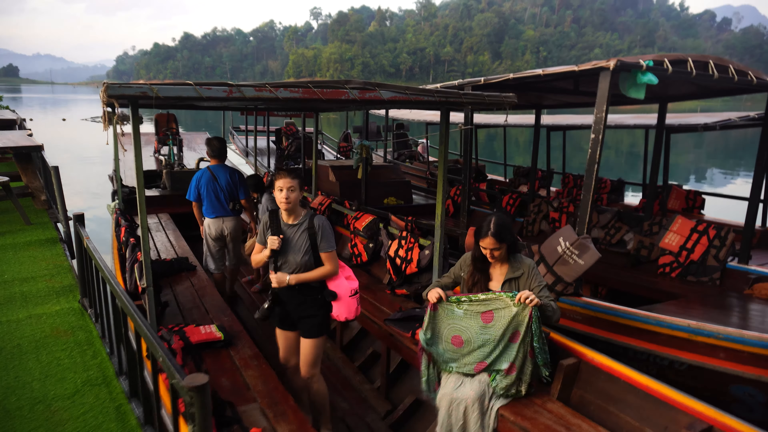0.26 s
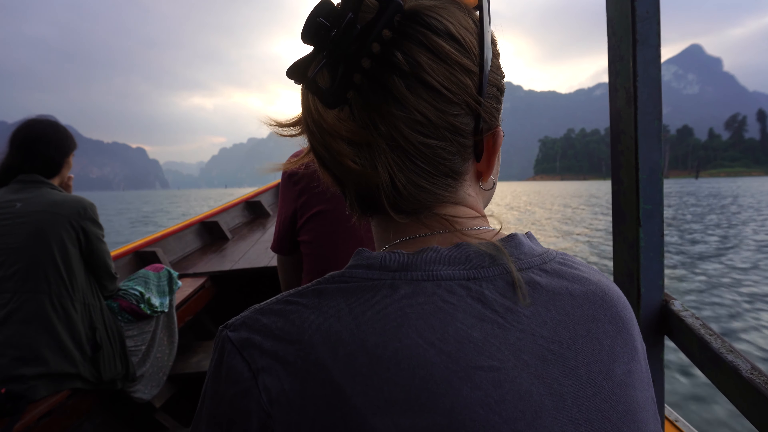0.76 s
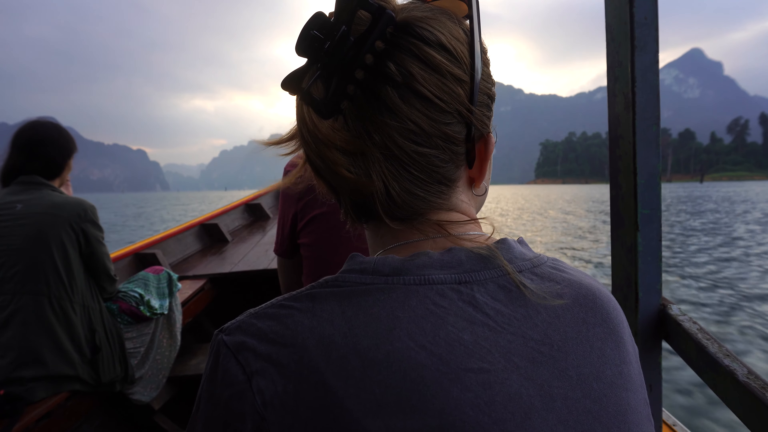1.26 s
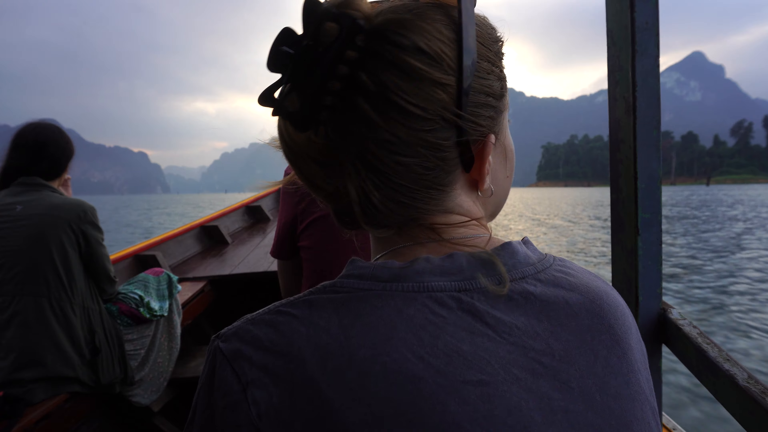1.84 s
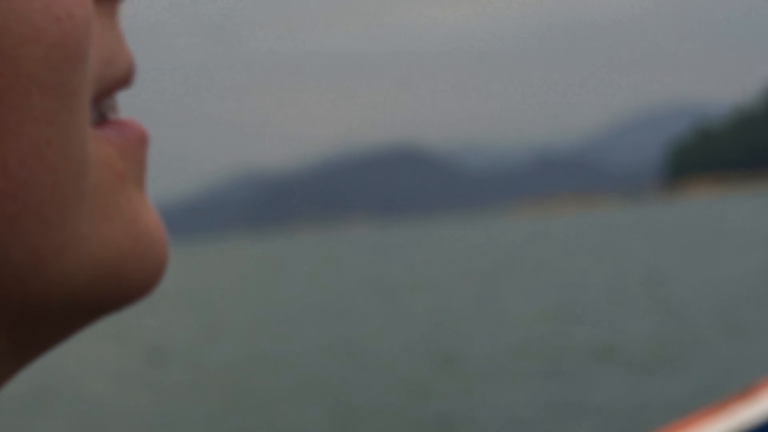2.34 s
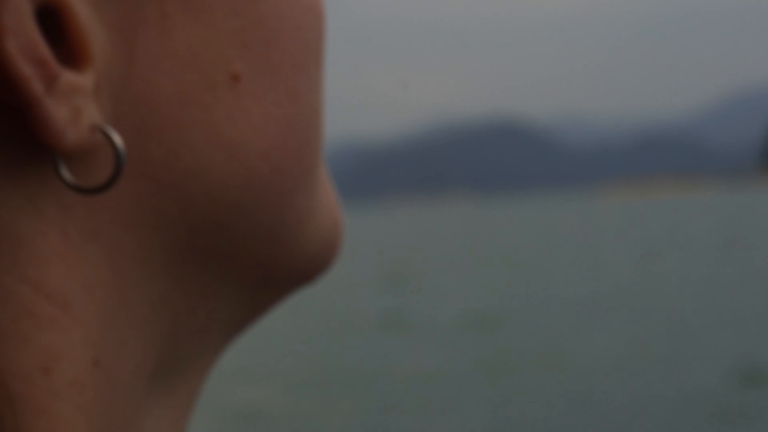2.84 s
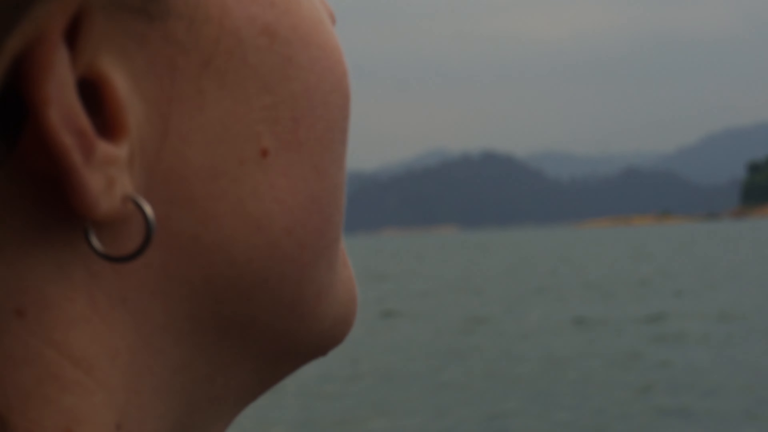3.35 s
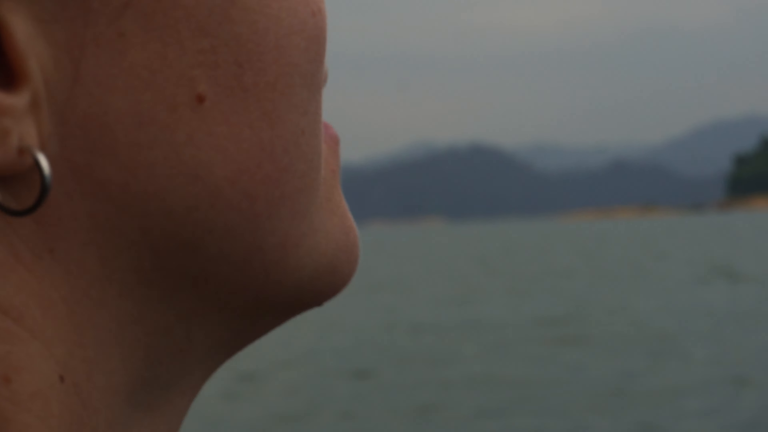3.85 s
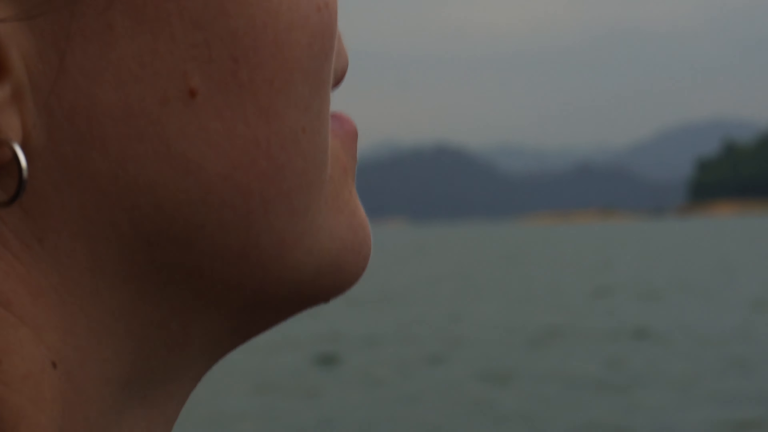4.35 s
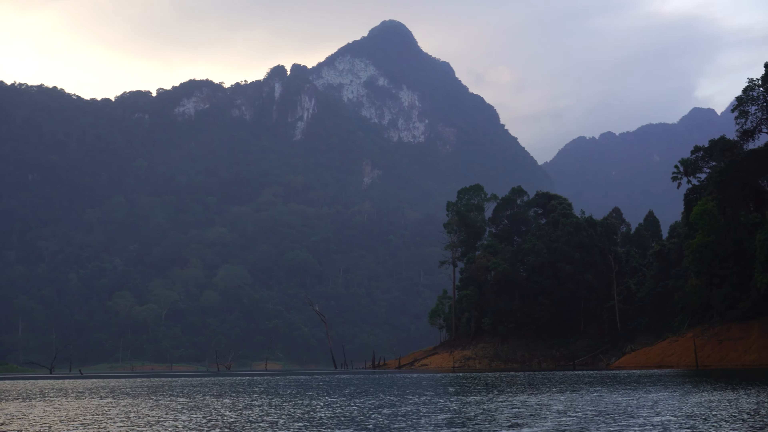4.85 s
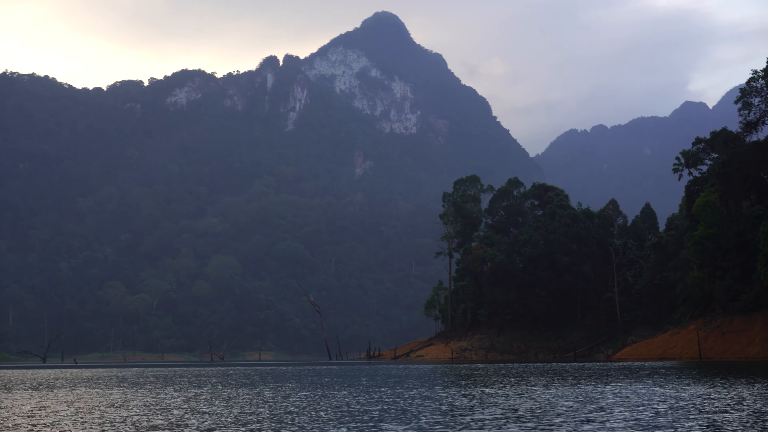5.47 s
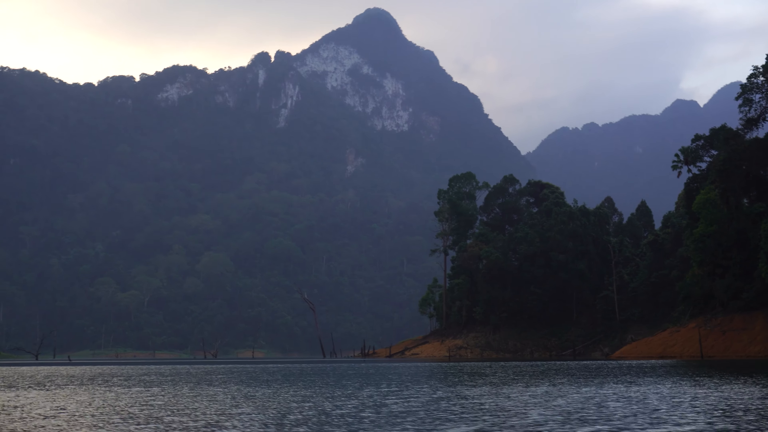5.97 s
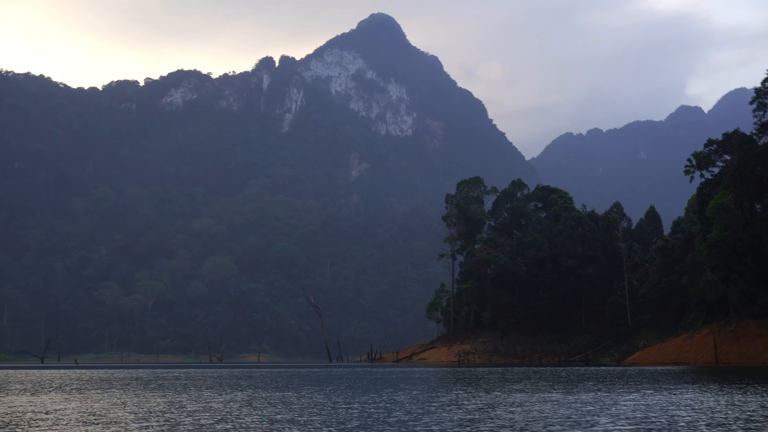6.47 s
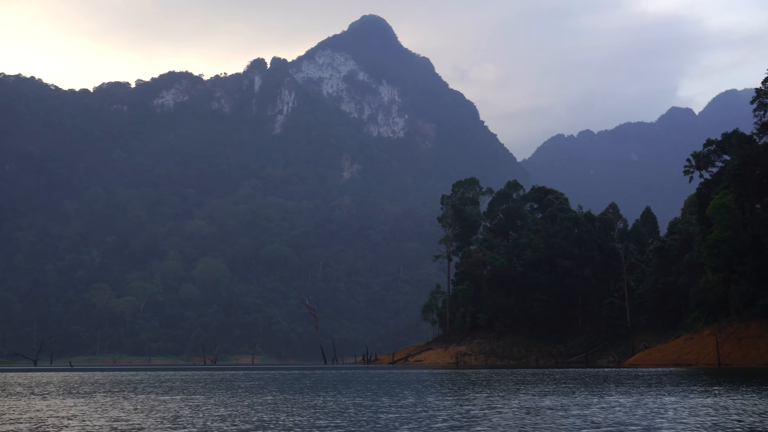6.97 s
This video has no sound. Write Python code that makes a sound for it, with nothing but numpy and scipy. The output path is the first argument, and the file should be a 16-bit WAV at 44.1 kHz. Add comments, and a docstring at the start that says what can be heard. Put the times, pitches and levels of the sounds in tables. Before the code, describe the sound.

Quiet pier breeze with a tick and scuffs, then abruptly a loud droning longtail boat engine, spray hiss and wind buffeting, briefly cut by silence.

```python
"""A longtail boat on a lake. First, at the quiet pier, a light breeze, a tick, a squeak and a few scuffs:
noise under decaying envelopes. Then a stretch at cruising speed facing the bow, an instant of silence,
and a slightly slower stretch facing the shore, with a tick and thin squeaks. Under way, trains of impulses
from firings and valves excite hull and cover resonances, orders of the engine cycle sing as sines, spray
hisses as patchy noise, and the head wind buffets the microphone as low noise."""
import sys
import numpy as np
from scipy import signal
from scipy.fft import rfft, irfft, next_fast_len
from scipy.io import wavfile
from scipy.ndimage import uniform_filter1d, minimum_filter1d, map_coordinates

SR = 44100
rng = np.random.default_rng(int(sys.argv[2]) if len(sys.argv) > 2 else 0)


def unload_wav(signal):
    """Save mono or channel-first audio to the path in sys.argv[1] as 16-bit WAV at rate SR, clipped to [-1, 1]."""
    wavfile.write(
        sys.argv[1],
        SR,
        np.round(np.clip(np.atleast_2d(signal).T, -1, 1) * 32767).astype(np.int16),
    )


N = 318402

CAST_OFF_S, CUT_S, RESUME_S = 0.541, 4.709, 4.791
GUST_HALF_S = 0.029  # from the centre of a gust to 1/e of its dB
HULL_EDGE_HZ = 1080  # above this the hull's ring falls away steeply
TOP_HZ = 15830

# Spectrum levels are relative: each noise is scaled to rms 1 before its layer level.
# Air at the pier, and its slow change of level: [hz, density_db]; [time_s, change_db]
PIER_AIR = [(6, 4.5), (14, 2), (29, -19), (55, -24), (120, -26), (200, -28.5), (450, -27.5), (800, -33.5),
            (1400, -43.5), (3600, -50), (5300, -52), (7000, -60), (15000, -67)]
PIER_LULL = [(.16, 1), (.2, -1), (.29, -2), (.33, 2)]
# Puffs of breeze: [centre_s, relative_db, half_length_s]; their spectrum: [hz, density_db]
PUFFS = [(0.029, 11.5, 0.037), (.345, 13, .05)]
PUFF_AIR = [(6, 4), (16, 4), (30, -12), (55, -25), (120, -38)]
# Scuffs on the pier, levels before the envelope: [start_s, thud_db, scrape_db, rise_s, t60_s]
SCUFFS = [(0.307, -31.5, -58, 0.001, 0.13), (.338, -53, -40, .014, 0.68), (0.374, -32, -53, 0.003, 0.3),
          (0.454, -27.5, -40, 0.0034, 0.35)]
# Spectra of the thudding boards and of the scrape: [hz, density_db]
BOARDS = [(40, -13), (120, -3.5), (380, 5.5), (650, -0.5), (900, 3), (1400, -7.5), (2500, -16), (6000, -45)]
SCRAPE = [(500, -1), (1400, -1), (2500, 0), (3600, 2), (5400, -4), (7000, -14.5), (15000, -23)]

# Ticks of the boat's fittings, level before the envelope: [start_s, level_db, t60_s]
TICKS = [(.2295, -25, .012), (6.033, -36, .012)]
# Spectrum of a tick: [hz, density_db]
CLICK = [(300, -20), (1200, -16), (1750, 0), (2800, -2), (3700, -11), (7000, -17), (11000, -27),
         (14000, -45)]
# Thin squeaks and pings: [centre_s, pitch_hz, level_db, half_length_s, phase_scatter_rad]
SQUEAKS = [(.25, 3330, -54, 0.065, .55), (6.06, 5200, -48, .035, 1.5), (6.137, 2250, -34, .004, 2),
           (6.543, 5000, -44, 0.0062, 3), (6.701, 3480, -33, 0.005, 1.2), (7.099, 3790, -39, 0.007, 2.5)]

# Head wind between gusts, before the layer offsets: [time_s, buffet_db, flutter_db]
WIND_BOW = [(0.56, -18.5, -25.5), (0.68, -16.5, -26), (.86, -19.5, -27), (.97, -11.5, -26),
            (1.12, -15, -23), (1.27, -16, -30), (1.38, -13, -27), (1.5, -22, -32.5), (2.05, -23, -30),
            (2.2, -20.5, -26.5), (2.45, -15.5, -24.5), (3.33, -17.5, -27.5), (3.7, -11, -21),
            (4.05, -18, -24.5), (4.48, -14.5, -24), (4.68, -20, -30.5)]
WIND_SHORE = [(4.82, -10.5, -20), (5.0, -9.5, -19), (5.55, -15.5, -22.5), (6.0, -14, -19),
              (6.4, -14.5, -23), (7.2, -16.5, -20.5)]
# Gusts, a few of them faint lulls: [centre_s, change_db]
GUSTS = [(.66, 6.5), (.76, 7.5), (1.2, 5), (2.31, 6), (2.5, -1.5), (2.69, 4.5), (2.86, 5), (3.0, 2),
         (3.151, 9), (3.45, -0.5), (3.59, 3.5), (3.73, 3), (3.92, 6), (4.26, 6.5), (4.54, 7.5), (5.048, 3),
         (5.45, 2), (5.73, 7.5), (5.91, 10.5), (6.2, 4.5)]
# Spectra of the large eddies' push and the small eddies' flutter: [hz, density_db]
BUFFET_BOW = [(4, -15), (12, 1), (22, 5), (42, -3), (65, -8), (100, -14), (180, -39)]
BUFFET_SHORE = [(6, -11), (20, -6), (44, 1), (62, -6.5), (85, -5.5), (120, -19), (200, -29)]
FLUTTER_BOW = [(50, -9), (100, 0), (150, -1.5), (215, -6), (280, -14.5), (450, -25.5), (900, -25.5)]
FLUTTER_SHORE = [(50, -35), (105, -1), (165, 0), (215, -10), (290, -18), (450, -26.5), (900, -27.5)]
# Slaps of air that pin the microphone: [centre_s, pressure_db re full scale, half_length_s]
SLAPS = [(1.2, -9, .0035), (3.544, 3, 0.0035), (4.231, -12, 0.0015), (4.4605, -10, 0.0045)]

# Spectra of the spray: [hz, density_db]
WASH_BOW = [(150, 0), (400, 12), (900, 7), (1400, 5.5), (2100, -1), (2800, -4), (3500, -1.5), (4300, -8),
            (5200, -7), (6200, -14), (7500, -18), (10000, -21), (12500, -24.5), (15500, -30.5)]
WASH_SHORE = [(150, -5), (400, 8), (900, 11.5), (1400, 5.5), (2100, -1), (2800, -0.5), (3600, -1),
              (4300, -6.5), (5300, -6.5), (6200, -13), (7500, -17.5), (10000, -20), (12500, -24),
              (15500, -29)]
# Drift of the boat's loudness, before the layer offsets: [time_s, engine_db, spray_db]
DRIVE_BOW = [(0.56, -31, -41.5), (1.6, -30, -40.5), (2.3, -28.5, -39.5), (3.4, -29, -39.5),
             (4.68, -31.5, -41.5)]
DRIVE_SHORE = [(4.82, -33, -42), (5.2, -32, -40.5), (6.35, -32, -43), (6.9, -32, -41.5), (7.2, -34, -41.5)]

# Engine speed: [time_s, working_cycles_hz]
SPEED = [(.5, 7.745), (2.9, 7.76), (3.3, 7.786), (4.71, 7.795), (4.79, 7.21), (5.8, 7.205), (7.2, 7.1)]
# Orders at which block and shaft sing, relative levels: [cycle_multiple, first_db, last_db]
SING_BOW = [(36, -15, -14), (45, -16, -17), (46, -15, -18), (74, -13, -14), (96, -20, -17), (108, -19, -17),
            (111, -8, -17), (114, -18, -17), (117, -19, -17), (119, -14, -14), (120, -14, -8),
            (122, -16, -12), (123, -18, -18), (125, -19, -18), (126, -17, -18), (128, -19, -19),
            (131, -19, -10), (132, -13, -7), (137, -19, -19), (138, -15, -17), (144, -19, -15),
            (148, -21, -16), (150, -22, -20), (156, -17, -21), (171, -19, -22)]
SING_SHORE = [(36, -14, -13), (62, -16, -17), (87, -13, -17), (114, -13, -21), (116, -26, -13),
              (119, -15, -18), (124, -13, -14), (129, -12, -13), (134, -15, -20), (135, -18, -16),
              (138, -15, -19), (140, -10, -11), (143, -9, -18), (144, -8, -11), (145, -17, -14),
              (227, -23, -22)]
# Blows of firings and valve gear, relative levels over one working cycle:
# [place_in_cycle 0-1, thump_db, clack_db, growth_over_stretch_db]
KNOCKS_BOW = [(.045, 0, 0, -2), (.09, -2, -6, -2), (.135, -3, 5, 0), (.215, 2, 5, 0), (.372, 1, 1, 0),
              (.417, 6, 6, -3), (.485, -1, 0, 2), (.553, -1, 0, 2), (.595, 1, -4, 2), (.665, -3, 2, 0),
              (.755, 6.5, -3, 3), (.838, 0, -10, 4), (.915, 2, -1, 4), (.98, 1, -4, -4)]
KNOCKS_SHORE = [(.034, 6.5, 4, -2), (.128, -2, -5, 2), (.208, 5, 1, 1), (.3, -2, 0, 4), (.412, 2.5, 1, 0),
                (.463, 1.5, -4, 0), (.54, 2, 3, 6), (.672, 4, 4, -2), (.743, 2, 5, -5), (.835, -1, -6, -3),
                (.88, 6, -4, -9), (.958, -4, -6, 0)]
# Resonances of engine and hull, and of the metal covers: [centre_hz, width_hz, relative_db]
HULL_BOW = [(367, 150, -10), (748, 32, -4), (880, 91, 1.5), (925, 92, 2.5), (1032, 62, 0)]
HULL_SHORE = [(411, 95, -7), (705, 84, -6.5), (857, 98, -0.5), (960, 49, 4), (1057, 63, 3.5)]
COVERS = [(1151, 69, -4), (1220, 56, -2), (1316, 71, -0.5), (1483, 37, 0), (1608, 37, 1.5),
          (1749, 53, -4.5)]


def amp(db):
    """Level to amplitude: 20 dB is a factor of ten."""
    return 10 ** (np.asarray(db) / 20)


def unit(x):
    """Normalization by the root mean square, to rms 1."""
    return x / np.sqrt(np.mean(x ** 2) + 1e-20)


def clock():
    """Uniform sampling: the time of every sample in seconds."""
    return np.arange(N) / SR


def curve(rows, column=1):
    """Linear interpolation of one column of a table over the time in its first column."""
    rows = np.asarray(rows)
    return np.interp(clock(), rows[:, 0], rows[:, column])


def wobble(rate):
    """Band-limited fluctuation: a smooth curve through random knots, rate of them a second."""
    knots = rng.standard_normal(int(N * rate / SR) + 4)
    steps = np.arange(0, N * rate / SR + 1, 1 / 16)
    return np.interp(clock() * rate, steps, map_coordinates(knots, [steps]))


def swell(s, half):
    """Gaussian envelope centred at time s, down to 1/e after half seconds."""
    return np.exp(-((clock() - s) / half) ** 2)


def burst(s, rise, t60):
    """Exponential build-up from time s, times an exponential decay of 60 dB in t60 seconds."""
    age = np.maximum(clock() - s, 0)
    return (1 - np.exp(-age / rise)) * amp(-60 * age / t60)


def filtered(x, response):
    """Linear filtering: the spectrum of x times a response of frequency, zero-padded."""
    size = next_fast_len(N + SR // 2)
    spectrum = rfft(x, size) * response(np.fft.rfftfreq(size, 1 / SR))
    return irfft(spectrum, size)[:N]


def low_passed(x, hz, order):
    """Butterworth low-pass: a steep upper edge, with the result at rms 1."""
    sections = signal.butter(order, hz, fs=SR, output="sos")
    return unit(signal.sosfilt(sections, x))


def coloured(x, spectrum):
    """Spectral shaping by (hz, db) points joined on a log-frequency axis, at rms 1."""
    hz, db = np.transpose(spectrum)

    def response(f):
        return amp(np.interp(np.log(f + 1), np.log(hz + 1), db, right=-120))
    return unit(filtered(x, response))


def noise(spectrum):
    """Coloured Gaussian noise: a fresh random signal of the given spectrum at rms 1."""
    return coloured(rng.standard_normal(N), spectrum)


def resonate(x, modes):
    """Modal superposition: parallel damped resonators, neighbours in opposite phase, at rms 1."""
    def response(f):
        total = 0
        for k, (centre, width, db) in enumerate(modes):
            damping = 1j * f * width
            total = total + (-1) ** k * amp(db) * damping / (centre ** 2 - f ** 2 + damping)
        return total
    return unit(filtered(x, response))


def pier(air_db=-26.0, puff_db=-33):
    """Turbulence and friction: a breeze with a lull and puffs; scuffs thud on the boards and scrape."""
    breeze = amp(air_db) * amp(curve(PIER_LULL)) * noise(PIER_AIR)
    puff_level = sum(amp(puff_db + db) * swell(s, half) for s, db, half in PUFFS)
    thuds = sum(amp(db) * burst(s, rise, t60) for s, db, _, rise, t60 in SCUFFS)
    scrapes = sum(amp(db) * burst(s, rise, t60) for s, _, db, rise, t60 in SCUFFS)
    return breeze + puff_level * noise(PUFF_AIR) + thuds * noise(BOARDS) + scrapes * noise(SCRAPE)


def fittings():
    """Impact and phase modulation: ticks are short noise, squeaks are sines of wandering phase."""
    tick_level = sum(amp(db) * burst(s, 0.00067, t60) for s, db, t60 in TICKS)
    squeaks = np.zeros(N)
    for s, hz, db, half, scatter in SQUEAKS:
        phase = 2 * np.pi * hz * clock() + scatter * wobble(250)
        squeaks += amp(db) * swell(s, half) * np.sin(phase)
    return tick_level * noise(CLICK) + squeaks


def wind(strength, buffet_spectrum, flutter_spectrum, buffet_db, flutter_db, surge_db,
         lump_db=-0.33, ride=0.084):
    """Turbulence: large eddies push in gusts; small ones flutter in surges, hardest on large crests."""
    gust_db = sum(db * swell(s, GUST_HALF_S) for s, db in GUSTS)
    push = noise(buffet_spectrum)
    local_power = np.abs(uniform_filter1d(push ** 2, size=SR // 8))
    push = unit(push / np.sqrt(local_power + 0.11))  # evens out the chance swells of the noise
    surges = amp(surge_db * wobble(12) + lump_db * wobble(23))
    flutter = unit(noise(flutter_spectrum) * surges * (1 + ride * np.abs(push)))
    buffet_level = amp(curve(strength) + gust_db + buffet_db)
    flutter_level = amp(curve(strength, column=2) + flutter_db)
    return buffet_level * push + flutter_level * flutter


def slapped(sound):
    """Diaphragm overload: pushes of air pin it for milliseconds, and only the rumble gets through."""
    pinned = sum(np.exp(-np.minimum(np.abs(clock() - s) / half, 2) ** 8) for s, _, half in SLAPS)
    rumble = filtered(sound, lambda hz: 1 / (1 + (hz / 150) ** 4))
    pressure = sum(amp(db) * swell(s, half) for s, db, half in SLAPS)
    return sound - pinned * (sound - rumble) - pressure


def spray(drive, spectrum, db, patchy_db=1.0, splash_db=0.9, wave_db=.5):
    """Superposed splashes: bow-wave hiss, uneven in time and frequency, rising and falling with the chop."""
    z = signal.stft(rng.standard_normal(N), nperseg=512)[2]
    patches = uniform_filter1d(rng.standard_normal(z.shape), size=7, axis=0)  # across frequency
    patches = uniform_filter1d(patches, size=8, axis=1)  # across time
    hiss = signal.istft(z * amp(patchy_db * unit(patches)), nperseg=512)[1][:N]
    splashes = hiss * amp(splash_db * wobble(300))
    level_db = curve(drive, column=2) + db + wave_db * wobble(7.4)
    return amp(level_db) * coloured(splashes, spectrum)


def revolutions():
    """Phase as the integral of frequency: working cycles completed at every sample."""
    return np.cumsum(curve(SPEED)) / SR


def singing(orders, progress):
    """Harmonics of the cycle: sines that swell or fade, a little unsteady in level and phase."""
    waver_db, stray_rad = 1.4, .18
    turns = revolutions()
    total = np.zeros(N)
    for order, first_db, last_db in orders:
        level_db = first_db + (last_db - first_db) * progress + waver_db * wobble(5.35)
        phase = 2 * np.pi * (order * turns + rng.random()) + stray_rad * wobble(30)
        total += amp(level_db) * np.sin(phase)
    return np.sqrt(2) * total


def knocks(pattern, progress, column, jitter_s):
    """Periodic excitation: each cycle repeats its blows, each with its own fixed paths through the hull."""
    scatter_db, echo_db, echo_t60_s, rough = .9, -2, .04, .4
    turns = revolutions()
    cycles = np.arange(int(turns[-1]) + 1)
    t = np.arange(SR // 12) / SR
    decay = amp(-60 * t / echo_t60_s)
    decay /= np.linalg.norm(decay)
    direct, echoes = np.zeros((2, N))
    for row in pattern:
        place, db, growth_db = row[0], row[column], row[-1]
        times = np.interp(cycles + place, turns, clock())
        times = times + jitter_s * rng.standard_normal(len(cycles))
        shift_db = growth_db * (np.interp(times, clock(), progress) - .5)
        sizes = amp(db + shift_db + scatter_db * rng.standard_normal(len(cycles)))
        sizes = sizes * (cycles + place < turns[-1])  # no blows past the end
        samples = np.clip(times * SR, 0, N - 1).astype(int)
        blows = np.bincount(samples, sizes, N)
        direct += blows
        paths = decay * rng.standard_normal(len(t))
        echoes += signal.oaconvolve(blows, paths)[:N]
    # loose parts rattle differently after every blow
    rattle_power = np.abs(signal.oaconvolve(direct ** 2, decay ** 2)[:N])
    rattle = np.sqrt(rattle_power) * rng.standard_normal(N)
    return direct + amp(echo_db) * echoes + rough * rattle


def engine(drive, pattern, hull, orders, knock_db, clack_db, sing_db, clatter_db, muffle_hz=1900):
    """Forced vibration: blows ring hull and covers, orders sing, faint clatter comes from the block."""
    progress = np.interp(clock(), [drive[0][0], drive[-1][0]], [0, 1])
    thumps = knocks(pattern, progress, column=1, jitter_s=.00005)
    clacks = knocks(pattern, progress, column=2, jitter_s=.00002)
    ring = low_passed(resonate(thumps, hull), HULL_EDGE_HZ, order=12)
    clack = low_passed(resonate(clacks, COVERS), muffle_hz, order=6)
    clatter = coloured(clacks, [(1500, -2.5), (2200, 5.0), (3600, -2), (5200, 4), (8000, -31)])
    sing = singing(orders, progress)
    mix = amp(knock_db) * ring + amp(clack_db) * clack + amp(sing_db) * sing + amp(clatter_db) * clatter
    return amp(curve(drive)) * mix


def facing_bow():
    """Superposition of wind, spray and engine under way, facing forward."""
    air = wind(WIND_BOW, BUFFET_BOW, FLUTTER_BOW, buffet_db=2.25, flutter_db=2.0, surge_db=1.5)
    water = spray(DRIVE_BOW, WASH_BOW, db=7.5)
    motor = engine(DRIVE_BOW, KNOCKS_BOW, HULL_BOW, SING_BOW,
                   knock_db=-3.5, clack_db=-10.5, sing_db=-1, clatter_db=-21.0)
    return air + water + motor


def facing_shore():
    """Superposition of the same sources a little slower, facing across to the shore."""
    air = wind(WIND_SHORE, BUFFET_SHORE, FLUTTER_SHORE, buffet_db=0.5, flutter_db=0.5, surge_db=0.1)
    water = spray(DRIVE_SHORE, WASH_SHORE, db=6.5)
    motor = engine(DRIVE_SHORE, KNOCKS_SHORE, HULL_SHORE, SING_SHORE,
                   knock_db=-2.5, clack_db=-13, sing_db=0, clatter_db=-21)
    return air + water + motor


def scene():
    """Gating in time: the pier fades out just before the ride, whose two stretches a silence parts."""
    t = clock()
    ashore = np.clip((CAST_OFF_S - t) / .025, 0, 1)
    aboard = np.clip((t - CAST_OFF_S) / .01, 0, 1) * np.clip((CUT_S - t) / .0002, 0, 1)
    resumed = t >= RESUME_S
    stretches = pier() * ashore + slapped(facing_bow()) * aboard + facing_shore() * resumed
    return (stretches + fittings())[None]


def record(dry):
    """Peak limiting and band limiting: gain dips briefly at peaks over full scale; TOP_HZ is the edge."""
    hold, ramp = SR // 40, SR // 500  # samples
    needed = 1 / np.maximum(np.abs(dry[0]), 1)
    # the dip starts one ramp ahead of the peak and is held after it
    held = minimum_filter1d(needed, size=hold, origin=hold // 2 - ramp)
    gain = uniform_filter1d(held, size=ramp)
    return filtered(dry[0] * gain, lambda hz: hz < TOP_HZ)[None]


dry = scene()
out = record(dry)
unload_wav(out)
```